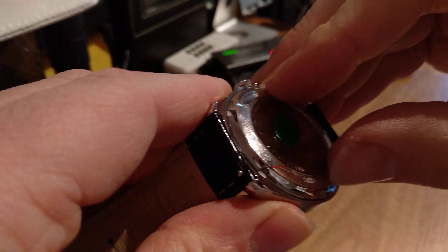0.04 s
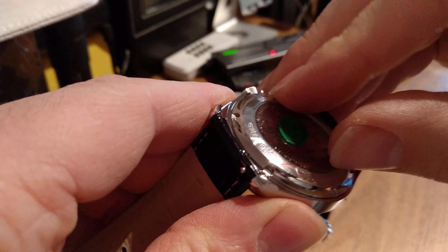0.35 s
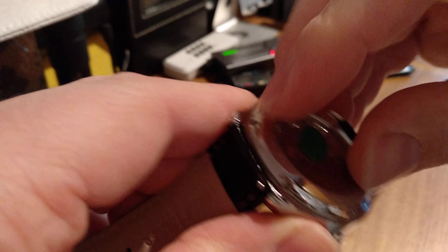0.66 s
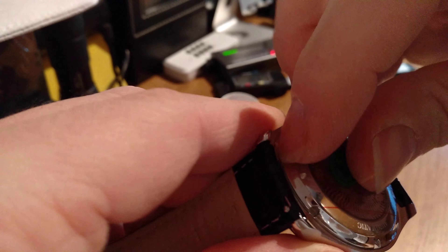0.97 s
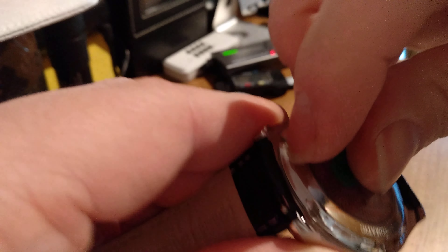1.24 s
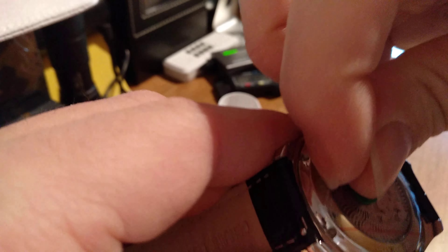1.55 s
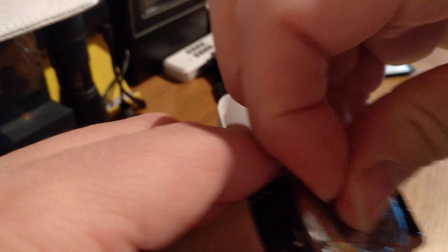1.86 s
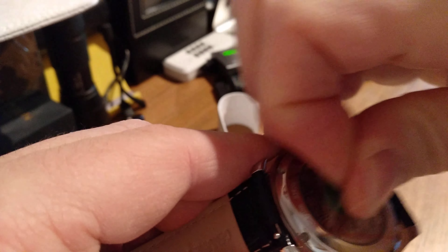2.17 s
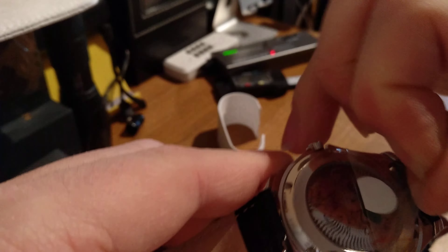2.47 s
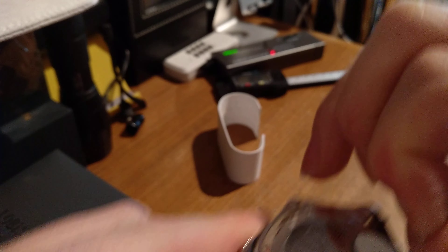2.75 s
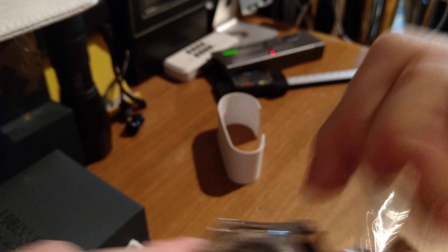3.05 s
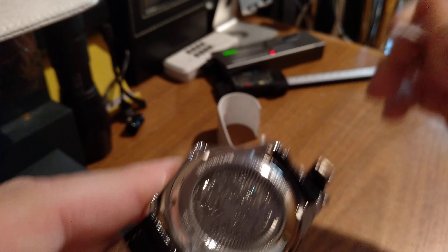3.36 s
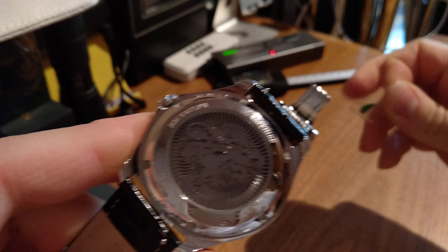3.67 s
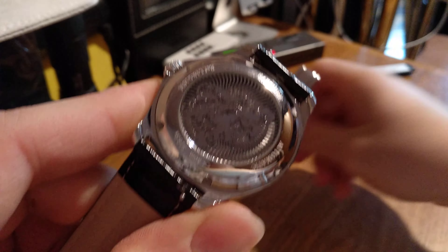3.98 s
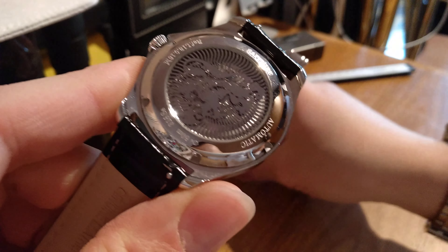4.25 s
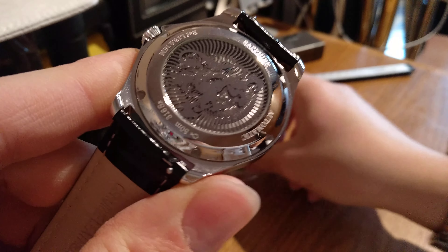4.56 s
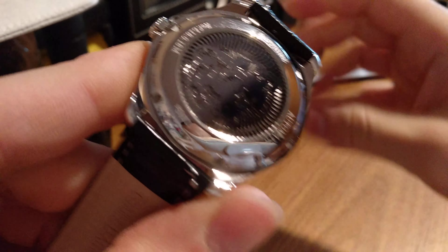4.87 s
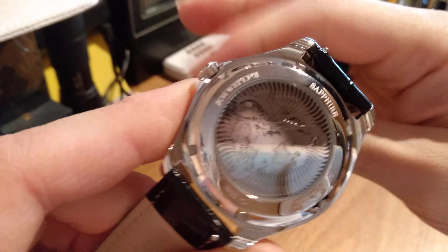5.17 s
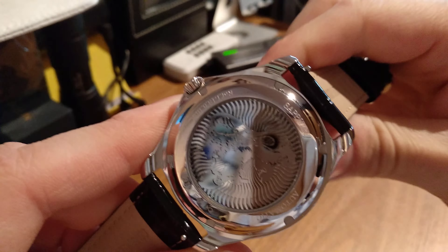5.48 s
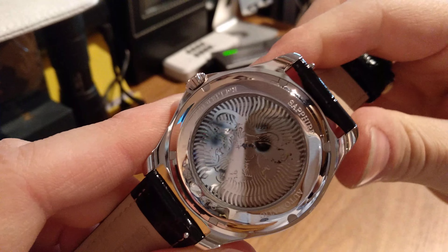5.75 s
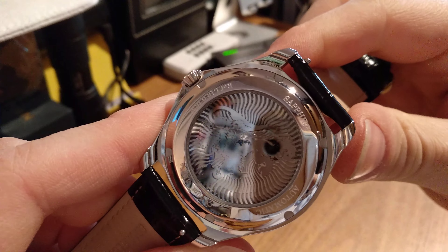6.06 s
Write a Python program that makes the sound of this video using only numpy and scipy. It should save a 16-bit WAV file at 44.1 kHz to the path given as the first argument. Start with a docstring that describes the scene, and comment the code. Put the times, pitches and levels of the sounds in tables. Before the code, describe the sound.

Close, sharp ticks and crackles of protective film being peeled from a wristwatch and crumpled, with soft finger rubs and small clinks.

```python
"""A desk in a small room, where plastic film is peeled off the steel back of a wristwatch, heard close up.
Picked loose, the film buckles in sharp snaps and hisses as its glue lets go in tiny ticks. It tears
free, and is crumpled and shaken off the fingers onto the desk. Hands knock, skin rubs, the clasp clinks
and the strap ticks. The room answers with a short reverberation, over a faint hiss and hum."""
import sys
import numpy as np
from scipy import signal
from scipy.fft import rfft, irfft
from scipy.io import wavfile
from scipy.ndimage import uniform_filter1d, map_coordinates

SR = 44100
rng = np.random.default_rng(int(sys.argv[2]) if len(sys.argv) > 2 else 0)


def inscribe(sig):
    """Save sig as 16-bit PCM at rate SR to the path in sys.argv[1].

    A 1-D sig is mono; a 2-D sig holds one channel per row.
    Samples are clipped to [-1, 1] before scaling.
    """
    pcm = np.round(np.clip(np.atleast_2d(sig).T, -1, 1) * 32767)
    wavfile.write(sys.argv[1], SR, pcm.astype(np.int16))


N = 274302
TIME, BINS = np.arange(N) / SR, np.fft.rfftfreq(N, 1 / SR)
EDGE_HZ = 16250  # upper band limit

# Spectrum of the background hiss. Each row: frequency in Hz, relative density in dB.
HISS_SPECTRUM = [(20, -1.5), (70, -8.5), (220, -8), (400, -10), (650, -11.5), (1300, -14.5), (2700, -18),
                 (10500, -16), (15500, -16)]
# Growth of the hum. Each row: time in seconds, level in dB.
HUM_LEVELS = [(0, -84.5), (1.5, -78), (5, -72), (5.85, -67.5), (6.22, -61.5)]
# Reverberation time. Each row: frequency in Hz, seconds to fall by 60 dB.
ROOM_DECAY = [(200, 0.19), (2000, 0.38), (8000, 0.28), (16000, 0.55)]
# Strength of the reverberation. Each row: frequency in Hz, gain in dB.
ROOM_GAIN = [(200, -11.5), (1200, -14.5), (3200, -14), (5500, -14.5), (9000, -10), (12000, -9.5),
             (16000, -19)]
# Shielding of the film by the fingers. Each row: time in seconds, gain toward the walls in dB.
WALL_EXPOSURE = [(1.6, 2.5), (1.93, -5), (2.55, -5.5), (2.7, -3), (3.15, 2.5), (3.5, -3), (4.5, 0)]
# Rubs of skin, and a brief high hiss around the snap at 1.93 s. Each row: middle in seconds,
# nominal length in seconds, level at the crest in dB, centre in Hz, width in octaves.
SWISHES = [(0.189, 0.031, -61.5, 5000, 1.36), (0.938, 0.083, -63.5, 7920, 0.162),
           (1.388, 0.086, -58.5, 8300, 0.268), (1.787, 0.0455, -57, 9414, .45),
           (1.931, 0.0326, -50, 11500, .3), (2.914, 0.27, -60.5, 9250, 1.86),
           (3.065, 0.148, -58.5, 10000, 0.45), (3.354, 0.0335, -51.5, 9500, 0.65),
           (3.47, 0.0623, -54.5, 10400, 0.347), (3.523, 0.051, -41, 8800, 0.967),
           (3.813, 0.0876, -54, 10100, 0.255), (4.233, 0.099, -48, 7000, 1.26),
           (4.448, 0.0264, -46, 7080, 1.5), (4.612, 0.092, -56.5, 4008, 0.98),
           (4.945, 0.0433, -61, 1280, 0.71), (5.086, 0.0226, -51, 9000, 2),
           (5.391, 0.127, -57.5, 4910, 2.52), (5.598, 0.086, -59.5, 8490, 1.3),
           (6.153, 0.1, -64, 1510, 0.72)]
# Short hollow tones under the film's snaps, and dull knocks of hands on the desk. Each row: start in
# seconds, level before the envelope in dB, decay in seconds, centre in Hz.
TONES_AND_KNOCKS = [(2.546, -15, 0.001475, 4240), (2.547, -31.5, 0.00174, 1440),
                    (2.656, -36.5, 0.00177, 1570), (2.709, -52, 0.00965, 168), (2.787, -62, 0.046, 212),
                    (2.975, -45, 0.0041, 559), (3.034, -33.5, .003, 1340), (3.118, -28, 0.0035, 700),
                    (3.394, -42.5, 0.00454, 940), (3.858, -44, 0.00637, 1050), (4.09, -52, 0.0473, 400),
                    (4.142, -21, 0.00194, 1774), (4.179, -39.5, 0.0152, 697), (4.215, -45, 0.067, 690),
                    (4.485, -26, 0.00942, 1720), (4.51, -42.5, 0.0245, 360), (4.606, -37, 0.0091, 500),
                    (4.620, -35, 0.01384, 625)]
# Steady lifting of the film. Each row: time in seconds, level in dB, resonance of the freed strip in Hz.
PEEL_COURSE = [(2.12, -65.5, 8080), (2.18, -58, 7535), (2.26, -54, 5480), (2.35, -54.5, 4660),
               (2.40, -52, 4500), (2.50, -57.5, 4000), (2.54, -59.5, 3900)]
# Spectrum of the parting glue. Each row: frequency in Hz, relative level in dB.
GLUE_SPECTRUM = [(1000, -24.5), (3500, -16.5), (7000, -8), (9000, -0.5), (11500, -3), (16000, -14)]
# Low pops as the hardest snaps overload the microphone. Each row: start in seconds, peak in dB,
# decay in seconds.
OVERLOAD_POPS = [(1.5029, -4, 0.0000514), (3.1188, -9.5, 0.00011)]
# Film torn free or squeezed. Each row: start in seconds, length in seconds, mean crinkle level in dB.
CRUMPLINGS = [(3.117, .012, -22.5), (3.836, .035, -32.5), (4.054, .045, -33.5), (4.155, .06, -29),
              (4.23, .075, -35.5), (4.479, .01, -27)]
# Sharp clicks: film snaps, clasp clinks and strap ticks. Each row: start in seconds, level in dB, ring
# in Hz, body near 4 kHz in dB, treble at 13.5 kHz in dB; the last two are relative to 8.5 kHz.
CLICKS = [(0.036, -46.5, 10030, -5, -5), (0.4638, -37, 11700, -19, 3), (1.069, -49.5, 5720, 2, -8),
          (1.492, -34, 9900, -23, 5), (1.4973, -16, 10680, -11.5, 5.5), (1.5023, -13, 12580, -13, -8),
          (1.5131, -17, 9800, -14.5, -2.5), (1.933, -12.5, 11840, -6, 7), (2.0338, -19.5, 13500, -26, 4),
          (2.1794, -31, 14700, -6.5, -0.5), (2.365, -29.5, 4620, 4.5, -24.5),
          (2.5182, -40.5, 1450, 10.5, -7.5), (2.547, -12.5, 10230, -3, -2.5), (2.656, -9.5, 8677, -9, -4),
          (2.975, -37.5, 1460, 14, -13), (3.0332, -23, 11340, 6, -1.5), (3.1017, -18, 10820, -6, -4.5),
          (3.1186, -9, 11930, -1.5, -2), (3.1243, -11.5, 10290, -16, -3.5), (3.1264, -10, 12080, -4, -6.5),
          (3.313, -44, 9900, -2.5, -1), (3.3278, -32.5, 9530, -14.5, -12.5), (3.3714, -26.5, 9860, -11, -2),
          (3.5376, -25, 9380, -8.5, -21.5), (3.541, -23.5, 11260, -4.5, -5), (3.8076, -35, 7840, -4, -15),
          (3.8326, -19.5, 5400, -5, -5.5), (3.8709, -20.5, 9000, -4.5, -3.5), (4.0327, -29, 5640, -3, -15),
          (4.08, -10.5, 8140, -17.5, -2.5), (4.0908, -19.5, 8830, -14.5, -1),
          (4.0976, -17, 9600, -17, -6.5), (4.1396, -16.5, 8610, -13.5, -5), (4.1425, -7.5, 8620, -9, -7),
          (4.1714, -18.5, 8870, -5, -5.5), (4.1808, -18.5, 8960, 0, -9), (4.2204, -16, 7830, -1.5, -7),
          (4.2981, -21, 10080, -6.5, 1), (4.3099, -30.5, 8740, -0.5, -8), (4.4616, -19.5, 8770, -9, -16),
          (4.4651, -17, 7300, -1.5, -3.5), (4.4721, -13.5, 8830, -4, 6), (4.4831, -17.5, 9640, -9, -8.5),
          (4.4885, -14, 9500, -1.5, -3.5), (4.5671, -31, 11710, -10.5, -8.5),
          (5.1008, -27.5, 9500, -6.5, 5), (5.1613, -33, 12400, -6, 1), (5.3032, -42, 5600, -6.5, 0)]


def amp(db):
    """Amplitude grows tenfold for every 20 dB."""
    return 10 ** (np.asarray(db) / 20)


def unit(x):
    """Normalisation to rms 1."""
    return x / np.sqrt(np.mean(x ** 2) + 1e-30)


def read(points, hz):
    """Interpolation of a table on a log-frequency axis."""
    f, value = np.transpose(points)
    return np.interp(np.log(hz + 1), np.log(f + 1), value)


def add(mix, start, sound):
    """Superposition: a sound joins the mix at its start in seconds."""
    part = mix[max(round(start * SR), 0):][:len(sound)]
    part += sound[:len(part)]


def band(x, hz, octaves):
    """Band-pass filtering by a Gaussian in log frequency, scaled to rms 1."""
    away = np.log2((np.fft.rfftfreq(len(x), 1 / SR) + 1) / hz) / octaves
    return unit(irfft(rfft(x) * np.exp(-away ** 2 / 4), len(x)))


def minimum_phase(gain):
    """Minimum phase gives the most sudden impulse response that has this gain."""
    log_gain = np.log(np.maximum(np.r_[gain, gain[-2:0:-1]], 1e-5))
    return np.fft.ifft(np.exp(np.conj(signal.hilbert(log_gain)))).real


def slips(count, spread_db, size=24):
    """Random amplitude modulation turns noise into tiny slips of uneven strength."""
    strength = amp(spread_db * unit(uniform_filter1d(rng.standard_normal(count), size)))
    return rng.standard_normal(count) * strength


def background(hiss_db=-63.5, hum_hz=278.3):
    """Broadband noise is heard as steady hiss, narrowband noise as a wavering hum that slowly grows."""
    hiss = unit(irfft(rfft(rng.standard_normal(N)) * amp(read(HISS_SPECTRUM, BINS)), N))
    hum = band(rng.standard_normal(N), hum_hz, octaves=.14)
    return amp(hiss_db) * hiss + amp(np.interp(TIME, *np.transpose(HUM_LEVELS))) * hum


def room(x, hold_s=0.038, build_s=0.003, size=22050):
    """Reverberation: the tail swells, stays level briefly, then dies away band by band."""
    hz, t, spectra = signal.stft(rng.standard_normal(size), SR, nperseg=256)
    fall_db = -60 * np.maximum(t - hold_s, 0) / read(ROOM_DECAY, hz)[:, None]
    tail = signal.istft(spectra * amp(fall_db), SR, nperseg=256)[1][:size]
    tail *= 1 - np.exp(-(np.arange(size) / SR / build_s) ** 2)
    colour = minimum_phase(amp(read(ROOM_GAIN, np.fft.rfftfreq(512, 1 / SR))))
    return signal.fftconvolve(x, np.convolve(tail / np.linalg.norm(tail), colour))[:N]


def draught(middle_s=3.65, spread_s=.35, db=-69, hz=25):
    """Air wafted by the waving hand makes slow pressure fluctuations at the microphone."""
    swell = np.exp(-((TIME - middle_s) / spread_s) ** 2)
    return amp(db) * band(rng.standard_normal(N), hz, octaves=.5) * swell


def squeak(middle_s=5.39, spread_s=0.0527, db=-63, hz=640):
    """Friction of a fingertip dragging on the strap gives a soft, low, narrowband squeak."""
    swell = np.exp(-((TIME - middle_s) / spread_s) ** 2)
    return amp(db) * band(rng.standard_normal(N), hz, octaves=0.1966) * swell


def swishes():
    """Bands of grainy noise swell and fade: sliding friction of skin, and a brief hiss around one snap."""
    out = np.zeros(N)
    for middle, length, db, hz, octaves in SWISHES:
        count = int(length * SR * 1.5)
        noise = band(slips(count, spread_db=2.5, size=60), hz, octaves)
        add(out, middle - count / SR / 2, amp(db) * noise * np.hanning(count))
    return out


def tones_and_knocks(rise_s=0.0014, desk_hz=325, desk_db=6, desk_decay_s=0.0094, size=12000):
    """Damped resonance: hollow tones under the snaps and dull knocks; the low ones make the desk ring."""
    out, t = np.zeros(N), np.arange(size) / SR
    for start, db, decay, hz in TONES_AND_KNOCKS:
        octaves = 0.569 * (decay / .01) ** 0.542  # a shorter one is more clearly pitched
        envelope = (1 - np.exp(-t / rise_s)) * np.exp(-t / decay)
        add(out, start, amp(db) * band(rng.standard_normal(size), hz, octaves) * envelope)
    desk = np.cos(2 * np.pi * desk_hz * t) * np.exp(-t / desk_decay_s) * 2 / (desk_decay_s * SR)
    return out + amp(desk_db) * signal.fftconvolve(out, desk)[:N]


def peel(reflection=.42, echo_s=(.00076, .00087), strip_width_hz=900, strip_db=3):
    """Ticks of parting glue drive the freed strip, whose resonance sinks as it lengthens."""
    times, db, strip_hz = np.transpose(PEEL_COURSE)
    ticks = irfft(rfft(slips(N, spread_db=3.0)) * amp(read(GLUE_SPECTRUM, BINS)), N)
    # the ticks come back a little later as bending waves reflected along the lengthening free strip
    delay = np.interp(TIME, times[[0, -1]], echo_s)
    echo = map_coordinates(ticks, [(TIME - delay) * SR], order=3)
    # a gliding resonator: shift down to 0 Hz, low-pass, shift back
    carrier = np.exp(2j * np.pi * np.cumsum(np.interp(TIME, times, strip_hz)) / SR)
    pole = np.exp(-np.pi * strip_width_hz / SR)
    baseband = signal.lfilter([(1 - pole) ** 2], [1, -2 * pole, pole * pole], ticks / carrier)
    strip = 2 * (carrier * baseband).real
    envelope = amp(np.interp(TIME, times, db, left=-120, right=-120))
    return unit(ticks + reflection * echo + amp(strip_db) * strip) * envelope


def pops(size=600):
    """One-sided decaying pulses stand for the low pops of a microphone overloaded by the hardest snaps."""
    out, t = np.zeros(N), np.arange(size) / SR
    for start, db, decay in OVERLOAD_POPS:
        add(out, start, amp(db) * np.exp(-t / decay))
    return out


def crinkles(count=8, spread_db=3.5, centre_hz=8700, spread_octaves=0.27, body_db=-3.5, treble_db=-7):
    """Crumpling buckles small facets of film at random moments; returns rows like those of CLICKS."""
    rows = []
    for start, length, db in CRUMPLINGS:
        times = start + length * (np.arange(count) + rng.random(count)) / count
        for at, (force, pitch) in zip(times, rng.standard_normal((count, 2))):
            ring_hz = centre_hz * 2 ** (spread_octaves * pitch)
            rows.append((at, db + spread_db * force, ring_hz, body_db, treble_db))
    return rows


def click_gain(hz, ring_hz, ring_db, body_db, treble_db):
    """Resonance shapes a click's spectrum: a narrow ring stands on a broad contour."""
    low_db = body_db - 7.5
    contour = [(100, low_db - 26), (600, low_db - 13),
               (1550, low_db + .5), (2100, low_db - .5),  # lift and dip of the hollow between the fingers
               (2900, body_db - 4), (4800, body_db - 1.5), (7500, 0), (10000, 0), (13500, treble_db)]
    width_hz = min(800, ring_hz / 3)
    detuning = (hz - ring_hz) / (width_hz / 2)
    ring = np.sqrt(1 + (amp(max(ring_db, 0)) ** 2 - 1) / (1 + detuning ** 2) ** 2)
    return amp(read(contour, hz)) * ring


def click(db, decay_s, ring_hz, ring_db, body_db, treble_db, size=2048):
    """Impulse excitation: one crack and a quick scatter of slips and hand reflections drive a ring."""
    t, hz = np.arange(size) / SR, np.fft.rfftfreq(size, 1 / SR)
    burst = rng.standard_normal(size) * np.exp(-t / max(decay_s, 1e-4))
    burst[0] = 3.015  # the crack
    whitening = minimum_phase(uniform_filter1d(abs(rfft(burst)) ** 2, size=90) ** -.5)
    colour = minimum_phase(click_gain(hz, ring_hz, ring_db, body_db, treble_db))
    response = irfft(rfft(whitening) * rfft(colour))[:size // 2]
    sound = signal.fftconvolve(burst, response)[:size]
    sound = signal.sosfilt(signal.butter(8, EDGE_HZ, fs=SR, output="sos"), sound)
    return amp(db) * unit(sound) * np.sqrt(SR / 1000 / size)  # level as if spread over one millisecond


def clicks(rows, scatter_share, ring_share, hard_db=-10, hard_decay_s=0.0015, halving_db=34.5):
    """Clicks of buckling film, clasp and strap superpose; harder ones end sooner and ring more clearly."""
    out = np.zeros(N)
    for start, db, ring_hz, body_db, treble_db in rows:
        decay_s = scatter_share * hard_decay_s * 2 ** ((hard_db - db) / halving_db)
        ring_db = ring_share * (15 + 0.1924 * (db - hard_db))
        add(out, start, click(db, decay_s, ring_hz, ring_db, body_db, treble_db))
    return out


def scene():
    """Direct and reverberant sound add; the room hears each click from all sides, so answers smoothly."""
    handling = peel() + swishes() + tones_and_knocks() + squeak()
    rows = list(CLICKS) + crinkles()
    direct = clicks(rows, scatter_share=1, ring_share=0.962)
    exposure = amp(np.interp(TIME, *np.transpose(WALL_EXPOSURE)))
    to_walls = clicks(rows, scatter_share=0, ring_share=.45) * exposure
    return (direct + handling + room(to_walls + handling) + pops() + draught() + background())[None]


def record(dry):
    """A linear-phase low-pass filter limits the bandwidth."""
    low_pass = signal.firwin(255, EDGE_HZ, window=("kaiser", 8), fs=SR)
    return signal.oaconvolve(dry, low_pass[None], "same")


dry = scene()
out = record(dry)
inscribe(out)
```